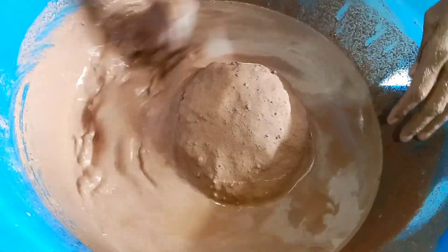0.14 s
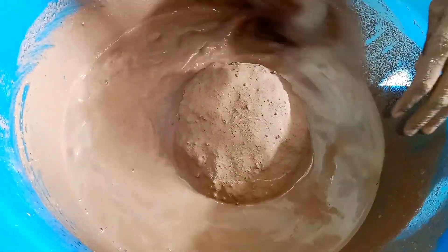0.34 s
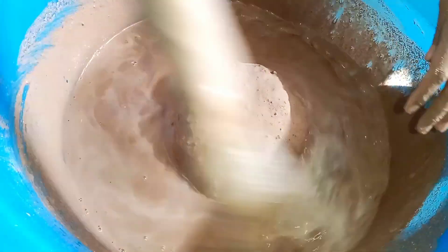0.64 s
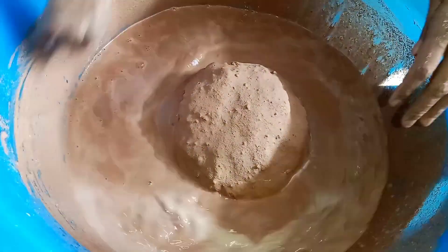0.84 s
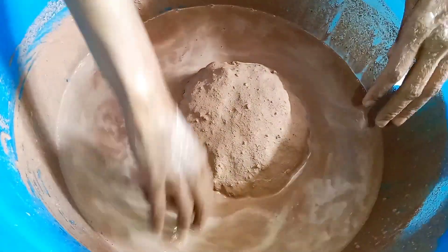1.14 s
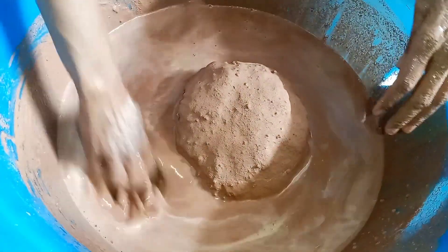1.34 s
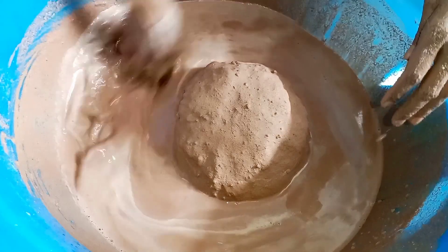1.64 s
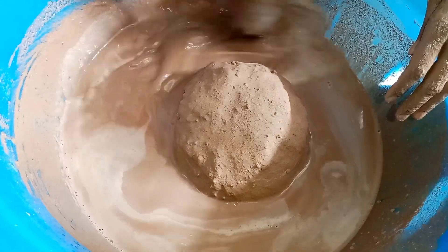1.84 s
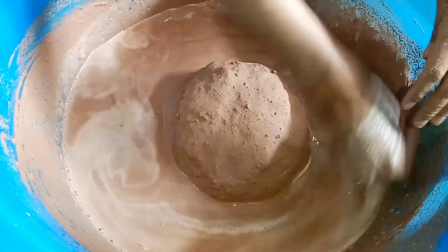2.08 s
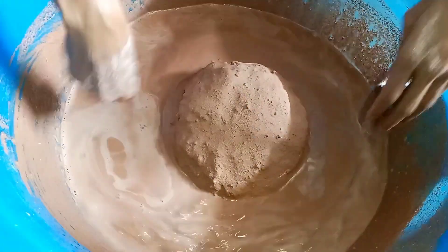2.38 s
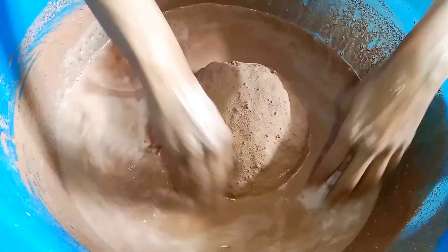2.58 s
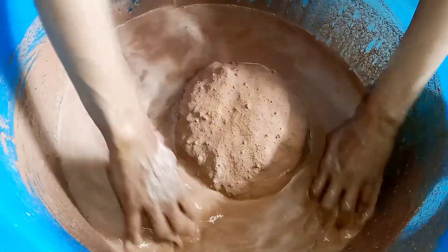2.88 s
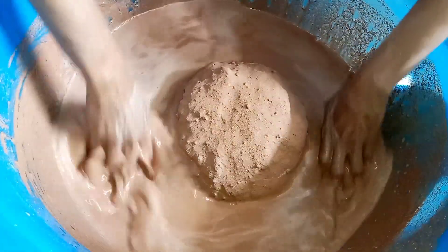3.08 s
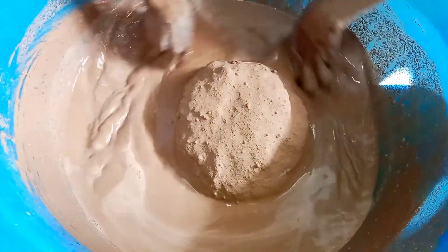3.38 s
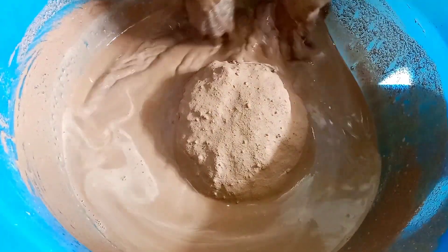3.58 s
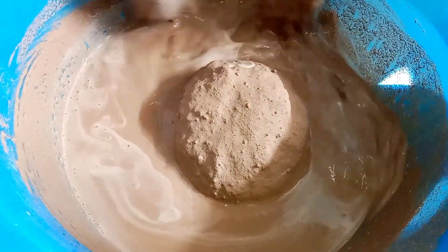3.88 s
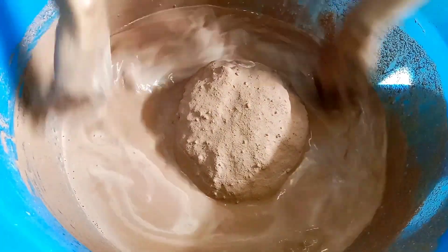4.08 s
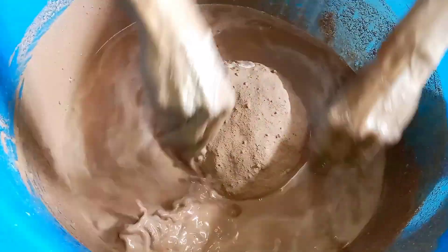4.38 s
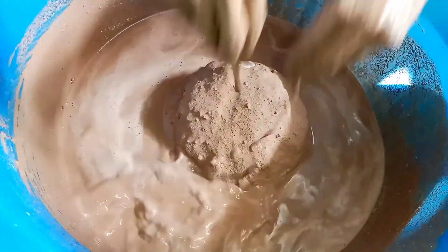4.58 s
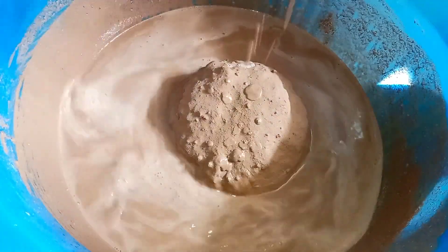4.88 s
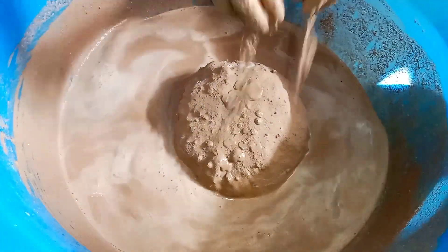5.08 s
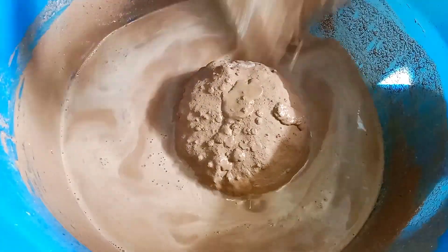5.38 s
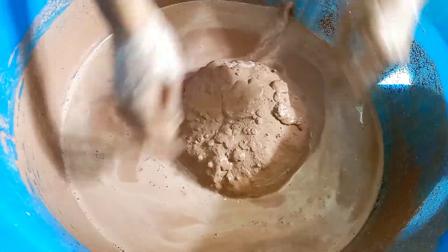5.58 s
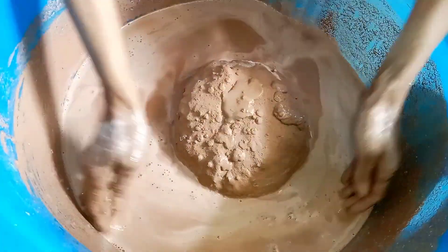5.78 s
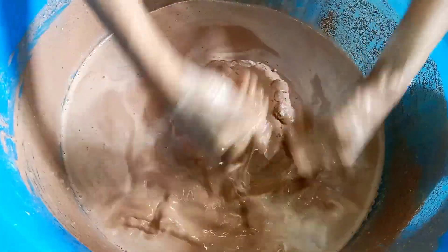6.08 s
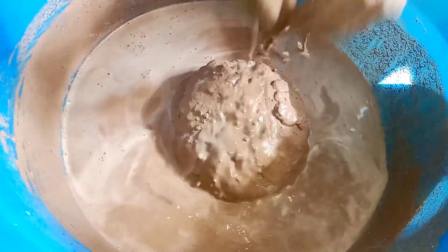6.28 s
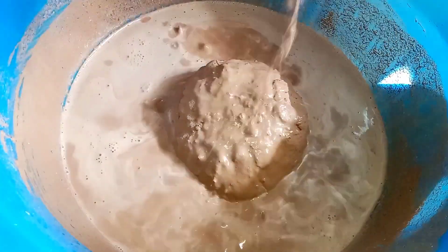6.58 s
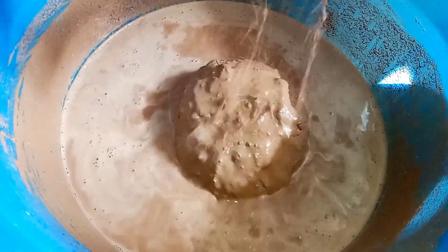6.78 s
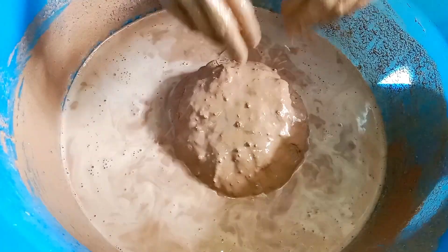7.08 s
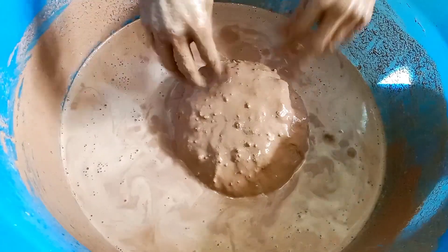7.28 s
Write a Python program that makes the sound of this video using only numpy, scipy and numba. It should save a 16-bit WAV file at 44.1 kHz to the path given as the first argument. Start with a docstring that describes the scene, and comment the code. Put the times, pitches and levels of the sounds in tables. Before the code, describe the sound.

Close, wet churning of muddy water in a plastic tub, loud at first, thinning to trickles and pattering drops, with faint birds and a far rooster.

```python
"""Hands stir thin mud round a plastic tub, close by, and let it run over a lump of clay.
Sloshes, strongest at first, fold in air: bubble clouds gurgle, babble and fizz, single bubbles plop and ring,
hollows behind the hands swish on gliding resonances, flat blows slap, and the tub booms on its lowest mode.
From about 4.6 s the stirring is mostly weaker. Birds, narrow bands of noise, call faintly at 1.2 s and from 5.3 s.
A far rooster, two blurred harmonics, crows from 6.2 s to 7.1 s; at 6.5 s drops patter on the clay as brief bubbles."""
import sys
import numpy as np
from scipy import signal
from scipy.fft import rfft, irfft
from scipy.io import wavfile
from scipy.ndimage import uniform_filter1d
from numba import njit

SR = 44100
rng = np.random.default_rng(int(sys.argv[2]) if len(sys.argv) > 2 else 0)


def transcribe(u):
    """Save the signal u as a 16-bit wav file named by the first command-line argument.

    u: samples, shape (n,) or (channels, n), limited to [-1, 1]; the rate is SR.
    q: integer samples, one column per channel.
    """
    v = np.clip(np.atleast_2d(u).T, -1, 1)
    q = np.round(v * 32767).astype(np.int16)
    wavfile.write(sys.argv[1], SR, q)


N = 328099
TIME = np.arange(N) / SR

# overall spectrum of the splashing, with a dip near 4.3 kHz: frequency_hz, gain_db
WATER_COLOUR = [(130, -13), (200, -7), (380, 0.5), (630, -3), (760, 4.5), (1350, -7), (1650, -4.5),
                (2100, -5), (3500, 4), (4100, -7.5), (4500, -8), (5600, 2.5), (8000, -5), (12500, -4.5),
                (15300, 1.5)]


def undb(db):
    """Level: decibels become an amplitude ratio."""
    return 10 ** (np.asarray(db) / 20)


def unit(x):
    """Normalisation: scale to rms 1."""
    return x / np.sqrt(np.mean(x ** 2))


def add(track, s, sound):
    """Superposition: mix a sound in at time s."""
    i = max(int(s * SR), 0)
    track[i:i + len(sound)] += sound[:max(N - i, 0)]


def band(x, lo_hz, hi_hz, order=3):
    """Band-pass filtering: keep what lies between two frequencies."""
    edges_hz = [lo_hz, min(hi_hz, SR / 2 - 1)]
    return signal.sosfilt(signal.butter(order, edges_hz, "band", fs=SR, output="sos"), x)


def colour(x, points, size=2048):
    """Minimum-phase filtering through (Hz, dB) points: causal, so that clicks keep their sharp front."""
    hz, db = np.transpose(points)
    bins_hz = np.maximum(np.arange(size // 2 + 1) * SR / size, 1)
    gain_db = np.interp(np.log(bins_hz), np.log(hz), db)
    cepstrum = irfft(np.log(undb(gain_db)))
    cepstrum[1:size // 2] *= 2  # folding the cepstrum forward makes the phase minimal
    cepstrum[size // 2 + 1:] = 0
    impulse = irfft(np.exp(rfft(cepstrum)))
    return signal.fftconvolve(x, impulse)[:N]


def walk(rate_per_s):
    """Slow random fluctuation, rms 1: straight lines between random knots."""
    knots = rng.standard_normal(N // 100)
    return unit(np.interp(TIME * rate_per_s, np.arange(len(knots)), knots))


def burst(t60_s, size=16384):
    """Exponential decay: noise that falls by 60 dB in t60_s."""
    return rng.standard_normal(size) * np.exp(-np.log(1000) * np.arange(size) / SR / t60_s)


def envelope(rise_s, hold_s, t60_s):
    """Build-up and decay: a swell that starts gently and steepens, a hold, an exponential fall."""
    age = TIME[:int((rise_s + hold_s + 2 * t60_s) * SR)]
    swell = np.clip(age / max(rise_s, 1 / SR), 0, 1) ** 2
    return swell * np.exp(-np.log(1000) * np.maximum(age - rise_s - hold_s, 0) / t60_s)


def resonance(hz, width_hz):
    """Narrow-band resonance: slow noise modulates a moving carrier in quadrature, rms 1."""
    low_pass = signal.butter(2, width_hz / 2, fs=SR, output="sos")
    slow = signal.sosfilt(low_pass, rng.standard_normal((2, len(hz))))
    angle = 2 * np.pi * np.cumsum(hz) / SR
    return unit(slow[0] * np.sin(angle) + slow[1] * np.cos(angle))


def echoes(x, t60_s, db, delay_s):
    """Reverberation: dense reflections that start after a short delay and decay exponentially."""
    tail = band(burst(t60_s, size=32768), 290, 6000, order=1)
    tail = tail / np.sqrt(np.sum(tail ** 2))
    tail = np.concatenate([np.zeros(int(delay_s * SR)), tail])
    return undb(db) * signal.fftconvolve(x, tail)[:N]


@njit
def bubbles(starts, pitches, sizes, lives, rise):
    """Bubble oscillation: each swells within a cycle, rings down, and rises in pitch as it nears the surface."""
    out = np.zeros(N)
    for k in range(len(starts)):
        first = max(int(starts[k] * SR), 0)
        length = int(lives[k] / pitches[k] * SR) + 2  # lives are in cycles, down to -60 dB
        step, phase, top = pitches[k] / SR, 0., 1e-9
        shape = np.empty(length)
        for i in range(length):
            shape[i] = (1 - np.exp(-1.5 * i * step)) * np.exp(-6.9 * i * step / lives[k])
            top = max(top, shape[i])
        for i in range(min(length, N - first)):
            out[first + i] += sizes[k] * shape[i] / top * np.sin(phase)
            phase += 2 * np.pi * step * (1 + rise * i / length)
    return out


def yard():
    """Stationary noise: the quiet yard and microphone hiss, shaped by a fixed spectrum."""
    # spectrum of the background: frequency_hz, gain_db
    yard_colour = [(30, -6), (80, 3.5), (160, -3.5), (400, -12.5), (1000, -22), (3000, -23), (4300, -44.5),
                   (7300, -25.5), (7900, -8), (10300, -13), (11000, -39), (15500, -27.5)]
    return undb(-62) * unit(colour(rng.standard_normal(N), yard_colour))


def birds():
    """Narrow-band noise: soft, hoarse calls that swell and fade, blurred by distance."""
    # faint far birds: start_s, length_s, pitch_hz, level_db (before the swell), width_hz
    bird_calls = [(1.166, 0.12, 2700, -67, 30), (5.33, 0.16, 1300, -69, 200), (5.64, 0.1, 2000, -69, 120),
                  (6.41, .09, 800, -51, 40), (6.68, .13, 800, -53, 50), (6.88, .19, 2490, -65, 70),
                  (6.97, 0.16, 719, -60, 35), (7.14, .12, 719, -59, 35), (7.06, .07, 1265, -64, 70),
                  (7.19, .17, 1280, -67, 90), (7.08, .28, 1880, -62, 220), (7.3, .1, 1950, -60, 70),
                  (7.36, .08, 2490, -67, 80)]
    out = np.zeros(N)
    for s, length_s, hz, db, width_hz in bird_calls:
        swell = np.sin(np.linspace(0, np.pi, int(length_s * SR)))
        call = resonance(np.full(len(swell), float(hz)), width_hz)
        add(out, s, undb(db) * swell * call)
    return out


def rooster(rough=0.0067, flutter_db=2.0, blur_db=-7, width_hz=110):
    """Multipath scattering: two harmonics of one far crow, the second the stronger, blurred by many paths."""
    # the crow swells and fades on its way: time_s, second_harmonic_db, fundamental_db
    crow_levels = [(6.16, -69, -85), (6.21, -51, -86), (6.28, -51, -70), (6.335, -40.5, -52),
                   (6.41, -50, -78), (6.485, -32.5, -49), (6.552, -42, -70), (6.59, -41.5, -45),
                   (6.635, -33, -42.5), (6.68, -41, -58), (6.77, -46, -52), (6.8, -48.5, -58),
                   (7.0, -66.5, -77), (7.101, -100, -100)]
    crow_hz, sag_from_s, sag_hz_per_s = 930, 6.66, 50.6
    s, second_db, first_db = np.transpose(crow_levels)
    steady_hz = crow_hz - sag_hz_per_s * np.maximum(TIME - sag_from_s, 0)
    hz = steady_hz * (1 + rough * walk(120))

    def partial(hz, db):
        """Scattering: a sine with a halo of scattered copies."""
        tone = np.sin(2 * np.pi * np.cumsum(hz) / SR) + undb(blur_db) * resonance(hz, width_hz)
        return unit(tone) * undb(np.interp(TIME, s, db, left=-np.inf, right=-np.inf))

    harmonics = partial(2 * hz, second_db) + partial(hz, first_db)
    return harmonics * undb(flutter_db * walk(30))


def tub(mode_hz=72, wander=0.043, rumble_db=-7):
    """Modal vibration: each flex booms on the tub's lowest mode; its pitch wanders as the water shifts."""
    # the tub flexes when the load shifts: start_s, hold_s, level_db (of the ring, without the rumble)
    tub_flexes = [(0.076, 0.074, -43), (0.3, .03, -45), (0.515, 0.021, -44.5), (0.919, 0.049, -45),
                  (1.395, 0.1, -42), (1.77, 0.21, -41), (2.325, 0.059, -43.5), (3.195, 0.019, -46.5),
                  (3.98, 0.011, -48), (4.266, 0.18, -43), (4.648, 0.21, -55.5), (5.38, 0.36, -55),
                  (5.836, 0.4, -47), (6.775, 0.11, -46.5)]
    rise_s, t60_s, rest_db = .055, 0.44, -71.5
    hz = mode_hz * (1 + wander * walk(4.7))
    ring = np.sqrt(2) * np.sin(2 * np.pi * np.cumsum(hz) / SR)
    rumble = unit(band(rng.standard_normal(N), 62, 112))
    flex = np.full(N, undb(rest_db))
    for s, hold_s, db in tub_flexes:
        add(flex, s, undb(db) * envelope(rise_s, hold_s, t60_s))
    return (ring + undb(rumble_db) * rumble) * flex


def hollow(x):
    """Sympathetic resonance: the tub and its air ring along with the water on a few fixed notes."""
    # resonances of the tub and the air inside it: frequency_hz, width_hz, gain_db
    tub_modes = [(194, 16, -0.5), (312, 14, -12.5), (768, 21, -4.5), (930, 17, -16), (1067, 12, -4),
                 (1390, 12, -6.5), (2740, 14, -6), (1555, 11, -10.5), (1626, 18, -10), (1742, 11, -5),
                 (2240, 21, -14), (2890, 13, -2.5), (3128, 42, -8), (5585, 260, -15.5)]
    out = np.zeros(N)
    for hz, width_hz, db in tub_modes:
        out += undb(db) * band(x, hz - width_hz / 2, hz + width_hz / 2, order=1)
    return out


def drops(db=-31, spread_db=4, lo_hz=2600, hi_hz=9500, cycles=13, count=60):
    """Random impacts: fine drops from the lifted hands patter on wet clay, each with its own size and note."""
    from_s, to_s = 6.47, 6.82
    when, note, size = rng.random((count, 3)).T
    starts = from_s + when * (to_s - from_s)
    pitches = lo_hz * (hi_hz / lo_hz) ** note
    sizes = undb(db - spread_db * np.log(1 - size * .97))  # many small, few large
    patter = bubbles(starts, pitches, sizes, np.full(count, float(cycles)), 0.14)
    return colour(patter, WATER_COLOUR)


def slaps():
    """Impact noise: hands and sheets of water hit the surface flat and throw a burst of spray."""
    # blows on the surface: start_s, level_db (before filtering), t60_s
    slap_blows = [(0.773, -14, 0.029), (2.342, -27.5, 0.19), (3.538, -18.5, 0.033), (4.53, -23, 0.046),
                  (5.827, -28, 0.063)]
    out = np.zeros(N)
    for s, db, t60_s in slap_blows:
        add(out, s, undb(db) * burst(t60_s))
    return band(colour(out, WATER_COLOUR), 710, 11000)


def swishes():
    """Cavity resonance: water sheeting past the fingers rings a hollow whose changing size glides its note."""
    # hollows: start_s, rise_s, hold_s, t60_s, level_db, first_hz, last_hz, width_hz
    hollow_glides = [(0.059, 0.015, 0.0075, 0.059, -28, 2300, 1483, 890),
                     (0.468, 0.013, 0.0036, .06, -22, 4355, 3100, 1800),
                     (1.409, 0.023, 0.054, .12, -40, 2900, 2206, 890),
                     (1.656, 0.0014, .02, .07, -26, 2920, 3200, 250),
                     (2.88, 0.065, 0.074, 0.32, -46, 1650, 1600, 600),
                     (2.932, 0.074, 0.19, .25, -52.5, 420, 389, 69.5),
                     (3.27, 0.041, .05, 0.13, -40, 1820, 1603, 447),
                     (3.353, 0.039, 0.022, 0.094, -36, 1700, 2088, 500),
                     (4.035, 0.026, 0.0073, .2, -22, 5040, 4500, 1100),
                     (4.104, 0.024, 0.022, 0.18, -44, 744, 626, 200),
                     (4.283, 0.0165, .03, .3, -46, 1471, 1296, 180),
                     (4.279, 0.017, 0.045, 0.25, -45, 2550, 3180, 400),
                     (4.413, 0.017, 0.013, 0.15, -49.5, 2400, 2340, 200),
                     (4.52, 0.0095, .005, 0.19, -50, 1093, 1000, 250),
                     (4.583, 0.027, 0.0079, 0.18, -60.5, 2710, 2700, 130)]
    out = np.zeros(N)
    for s, rise_s, hold_s, t60_s, db, first_hz, last_hz, width_hz in hollow_glides:
        shape = envelope(rise_s, hold_s, t60_s)
        hz = np.interp(TIME[:len(shape)], [0, rise_s + hold_s], [first_hz, last_hz])
        add(out, s, undb(db) * shape * resonance(hz, width_hz))
    return out


def gulps(cycles=15, rise=0.43):
    """Volume resonance: big air pockets closing behind a hand ring low."""
    # air pockets: start_s, peak_db, pitch_hz
    air_pockets = [(0.301, -17, 294), (0.313, -23, 194), (0.35, -19, 525), (0.792, -30.5, 127),
                   (1.756, -34.5, 382), (2.1, -25, 385), (2.904, -34, 167), (2.928, -32.5, 174),
                   (3.897, -26.5, 485), (6.663, -40.5, 196)]
    s, db, hz = np.transpose(air_pockets)
    return bubbles(s, hz, undb(db), np.full(len(s), float(cycles)), float(rise))


def plops(snap_hz=3600):
    """Impulsive excitation: a film snaps and the bubble under it rings."""
    # single bubbles, loud and faint: start_s, pitch_hz, peak_db, cycles (until silent)
    single_bubbles = [(0.0196, 1400, -13, 4.5), (0.031, 3140, -5.5, 8), (0.037, 3120, -11, 16),
                      (0.077, 1410, -13, 16), (0.104, 5700, -3, 8.7), (0.0811, 1370, -5, 12),
                      (0.0996, 7260, 0, 4.1), (0.1677, 2800, -8, 4.9), (0.2525, 2740, -15.5, 24),
                      (0.283, 1630, -2.5, 7.9), (0.354, 1640, -2, 27), (0.3917, 766, -16, 59),
                      (0.392, 2050, -3, 3.2), (0.4448, 5300, -9, 11), (0.36, 1580, -18, 18),
                      (0.376, 1520, -10.5, 14), (0.586, 3400, -16.5, 14), (0.4079, 1600, -7.5, 9.7),
                      (0.4816, 3080, -2, 38), (0.506, 2430, -3.5, 20), (0.5153, 2240, -4, 17),
                      (0.5275, 3280, -3, 16), (0.569, 6000, -5, 10), (0.6145, 3330, -12.5, 21),
                      (0.65, 5900, -15, 26), (0.7736, 960, -12.5, 20), (0.7992, 3110, -22, 9),
                      (0.9052, 6460, -9, 15), (0.822, 5840, -19, 14), (0.837, 5530, -13, 22),
                      (0.969, 2620, -21.5, 8.7),  (1.095, 2610, -37.5, 19), (1.5031, 2030, -11, 11.2),
                      (1.5403, 1720, -11, 18), (1.6286, 1800, -7, 7.3), (1.63, 827, -22, 42),
                      (1.641, 2310, -10.5, 14), (1.704, 960, -20, 35), (1.762, 2920, -8.5, 33),
                      (1.7633, 5570, -2.5, 13), (1.771, 3380, -5, 12), (1.882, 2120, -17, 5.9),
                      (1.9574, 710, -25, 37), (1.9943, 1400, -10, 12), (2.0332, 1570, -11, 7.8),
                      (2.061, 2770, -16, 18), (2.077, 3170, -25, 11), (2.994, 1710, -22.5, 20),
                      (2.1053, 3460, -13, 14), (2.491, 1400, -44, 90), (2.4998, 7230, -17.5, 11),
                      (3.1273, 2700, -15.5, 15), (3.178, 2225, -6.5, 40), (3.187, 7700, -6.5, 6.4),
                      (3.188, 1340, -22, 14), (3.19, 3000, -15, 6), (3.2286, 7200, -14.5, 3.8),
                      (3.422, 2600, -23.5, 23), (3.505, 1400, -40.5, 95), (3.5423, 1630, -18, 13),
                      (3.586, 1740, -29, 13), (3.7483, 1410, -24.5, 17), (3.7883, 2750, -19, 22),
                      (3.8166, 780, -24, 40), (3.8156, 6000, -14, 7.1), (3.832, 1800, -18, 9.1),
                      (3.877, 3250, -11, 9), (3.901, 780, -17, 21), (3.945, 3670, -19, 23),
                      (4.032, 1680, -12, 15), (3.8436, 5950, -5.5, 6.9), (3.8531, 1540, -10.5, 10),
                      (4.0052, 1600, -13.5, 17), (4.1026, 3300, -15, 7.2), (4.112, 2830, -11, 9),
                      (4.197, 2000, -30, 24), (4.296, 9200, -15, 4.9), (4.3474, 6900, -14, 20),
                      (4.481, 2400, -29.5, 27), (4.481, 1680, -34, 40), (4.497, 1070, -28, 33),
                      (4.532, 1004, -28, 50), (4.534, 5900, -22.5, 37), (5.1687, 10100, -21.5, 5.3),
                      (5.243, 7100, -23, 6.6), (5.922, 5130, -18, 6.3), (5.952, 1370, -26.5, 12),
                      (5.9822, 1790, -16.5, 12), (6.024, 1780, -24.5, 22), (6.166, 5600, -18, 28),
                      (5.9836, 1620, -22.5, 47), (6.033, 5650, -18.5, 38), (6.0606, 3120, -12, 6.4),
                      (6.098, 1430, -32, 75), (6.164, 1845, -27, 53), (6.4137, 6240, -24.5, 36),
                      (6.476, 3430, -24, 50), (6.498, 12500, -11, 36), (6.533, 2390, -29.5, 62),
                      (6.312, 2740, -40, 22), (6.665, 1650, -36, 27), (6.809, 3180, -32.5, 16),
                      (6.5337, 12600, -12, 6.5), (6.701, 11900, -12.5, 5.5), (6.756, 6230, -10, 5.6),
                      (6.8124, 6100, -10, 8.9), (6.882, 1030, -31, 37), (6.93, 6500, -19.5, 19),
                      (6.9541, 6630, -17.5, 34)]
    s, hz, db, cycles = np.transpose(single_bubbles)
    # relative to its bubble a snap is weaker by 3 dB for each doubling of the ring
    snap_db = db - 9 - 3 * np.log2(cycles / 10)
    snaps = np.zeros(N)
    for start_s, level_db in zip(s, snap_db):
        add(snaps, start_s, undb(level_db) * burst(t60_s=0.0073, size=1024))
    rings = bubbles(s, hz, undb(db), np.maximum(cycles, 1), .05)
    return rings + band(snaps, snap_hz, 16000, order=2)


def slosh_drive():
    """Incoherent addition: layer strengths sum in power; babble power weights the mean log bubble pitch."""
    # one row for each push of a hand or spill of water: start_s, rise_s, hold_s, t60_s (of the babble),
    # gurgle_db, babble_db, spray_db, mist_db, pitch_hz (typical bubble)
    slosh_pushes = [(0.0, 0.0017, .09, 0.23, -54, -22.5, -26, -32, 1910),
                    (0.155, 0.0092, 0.02, 0.95, -49, -30.5, -35.5, -41, 1565),
                    (0.286, 0.009, 0.12, 0.45, -35.5, -24.5, -32.5, -43, 1416),
                    (0.449, 0.024, 0.066, 0.32, -51, -23.5, -30.5, -41, 2105),
                    (0.563, 0.015, 0.041, 0.34, -51, -35.5, -34, -35.5, 1557),
                    (0.767, 0.007, .122, 0.33, -52.5, -28.5, -26.5, -27, 1749),
                    (1.35, 0.14, 0.088, 0.43, -61.5, -36.5, -43, -46, 2200),
                    (1.606, 0.031, 0.04, 0.39, -47.5, -31, -37.5, -44, 2028),
                    (1.707, .06, 0.016, 0.34, -39, -31, -30, -41, 1250),
                    (1.929, 0.013, .02, 0.27, -59, -30, -38.5, -52, 1050),
                    (1.966, 0.018, .09, .3, -62, -34, -38, -46, 2000),
                    (2.083, 0.0079, 0.0099, 0.32, -39, -35, -35, -37, 1600),
                    (2.14, .03, 0.038, 0.73, -63, -52, -44.5, -41, 1751),
                    (2.337, 0.0063, .015, 0.072, -72, -32.5, -30, -27.5, 1700),
                    (2.363, 0.054, 0.1, 0.26, -73, -59, -52, -48, 1986),
                    (2.838, 0.085, .05, 0.46, -42.5, -35.5, -37, -46, 1600),
                    (3.055, 0.099, .06, 0.71, -56, -38, -41, -53, 1760),
                    (3.268, .06, 0.084, .22, -62, -43, -49.5, -48, 2052),
                    (3.5, 0.04, 0.066, 0.22, -68, -44, -49, -56.5, 1600),
                    (3.723, 0.021, 0.039, 0.26, -81, -45.5, -45.5, -59, 1930),
                    (3.791, 0.027, 0.07, 0.87, -43.5, -30, -35, -41, 1743),
                    (3.918, 0.02, 0.11, .3, -73, -27, -29, -37.5, 1996),
                    (4.029, 0.028, 0.045, 0.3, -69, -26.5, -24.5, -31, 2700),
                    (4.06, .04, .03, 0.4, -59.5, -33, -54, -31, 941),
                    (4.27, 0.031, 0.06, 0.51, -66, -47.5, -40.5, -43.5, 2156),
                    (4.473, .02, 0.047, 0.25, -65, -50.5, -51.5, -48, 1083),
                    (4.621, .05, 0.3, 1, -80, -81, -72.5, -67, 2300),
                    (5.058, 0.025, 0.011, 0.24, -85, -71.5, -57.5, -55.5, 2486),
                    (5.137, .025, 0.0091, 0.25, -74, -56, -47.5, -43.5, 3052),
                    (5.5, 0.012, 0.037, 0.55, -68.5, -74.5, -64.5, -56.5, 1800),
                    (5.824, .004, 0.066, .45, -52.5, -39.5, -45.5, -51, 1975),
                    (5.95, .03, 0.093, 0.4, -56, -42.5, -43.5, -59, 1705),
                    (6.147, 0.011, 0.012, 0.35, -60, -50.5, -43.5, -46.5, 2400),
                    (6.307, 0.086, .05, 0.25, -51.5, -57, -52.5, -43, 2600),
                    (6.463, .012, .1, 0.27, -60, -50, -37, -39, 2700),
                    (6.644, .02, .08, 0.38, -54.5, -48.5, -40.5, -37.5, 1939),
                    (6.81, 0.049, 0.03, 0.3, -56, -44, -48, -42, 1150),
                    (7.084, 0.025, .03, 0.88, -65, -71, -64, -59, 1964),
                    (7.35, 0.052, 0.022, 0.32, -59.5, -69.5, -55.5, -74, 1885)]
    gurgle_linger, spray_linger, mist_linger = 0.89, 1.27, 1.15  # t60 as a multiple of the babble's
    gurgle, babble, spray, mist, pitch = np.full((5, N), 1e-24)
    for s, rise_s, hold_s, t60_s, gurgle_db, babble_db, spray_db, mist_db, hz in slosh_pushes:
        def power(db, linger):
            """Power of one layer of this slosh."""
            return (undb(db) * envelope(rise_s, hold_s, t60_s * linger)) ** 2

        babble_power = power(babble_db, 1)
        add(gurgle, s, power(gurgle_db, gurgle_linger))
        add(babble, s, babble_power)
        add(pitch, s, babble_power * np.log(hz / 2000))
        add(spray, s, power(spray_db, spray_linger))
        add(mist, s, power(mist_db, mist_linger))
    bubble_hz = 2000 * np.exp(pitch / babble)
    return np.sqrt(gurgle), np.sqrt(babble), np.sqrt(spray), np.sqrt(mist), bubble_hz


def wash(centre_hz, lo_hz, hi_hz, count=4):
    """Statistical limit: bubbles too faint to tell apart merge into noise, strongest near the typical pitch."""
    spread_octaves = 0.69
    edges = np.geomspace(lo_hz, hi_hz, count + 1)
    out = np.zeros(N)
    for lo, hi in zip(edges, edges[1:]):
        distance = np.log2(np.sqrt(lo * hi) / centre_hz) / spread_octaves
        out += unit(band(rng.standard_normal(N), lo, hi, order=2)) * np.exp(-(distance / 2) ** 2)
    return out


def cloud(gain, breaks_db, centre_hz, octaves, lo_hz, hi_hz, cycles, spread_db, wash_db, even_s, rise, count):
    """Random superposition: countless bubbles over a wash; flow weaker than breaks_db folds in little air."""
    when, size, life = rng.random((3, count))
    starts = when * N / SR
    centre_hz = centre_hz * np.ones(N)
    pitches = np.interp(starts, TIME, centre_hz) * 2 ** (octaves * rng.standard_normal(count))
    pitches = np.clip(pitches, 100, SR / 2 - 2000)
    sizes = undb(-spread_db * np.log(1 - size * .98))  # many small, few large
    x = bubbles(starts, pitches, sizes, cycles * 4 ** (life - .5), rise)
    folded_air = gain ** 2 / (gain ** 2 + undb(breaks_db) ** 2)
    x = unit(band(colour(x, WATER_COLOUR), lo_hz, hi_hz)) * folded_air
    smooth = colour(wash(centre_hz, lo_hz, hi_hz), WATER_COLOUR)
    x = x + undb(wash_db) * unit(band(smooth, lo_hz, hi_hz))
    # even out the local power over even_s, so that the gain alone sets the level
    width = int(even_s * SR)
    power = uniform_filter1d(uniform_filter1d(x ** 2, width), width)
    return gain * x / np.sqrt(np.abs(power) + 1e-12)


def sloshing():
    """Air entrainment: pockets gurgle, beads babble, droplets fizz, and the finest mist sizzles."""
    gurgle_gain, babble_gain, spray_gain, mist_gain, bubble_hz = slosh_drive()
    gurgle = cloud(gurgle_gain, breaks_db=-58.5, centre_hz=398, octaves=.55, lo_hz=158, hi_hz=720,
                   cycles=31, spread_db=4.0, wash_db=-9.0, even_s=0.022, rise=0.33, count=1400)
    babble = cloud(babble_gain, breaks_db=-41, centre_hz=bubble_hz, octaves=.5, lo_hz=720, hi_hz=4380,
                   cycles=39, spread_db=4.5, wash_db=-7.5, even_s=0.018, rise=.18, count=6000)
    spray = cloud(spray_gain, breaks_db=-49, centre_hz=6840, octaves=.5, lo_hz=4297, hi_hz=10540,
                  cycles=24, spread_db=8.0, wash_db=-3, even_s=0.11, rise=0.089, count=15000)
    mist = cloud(mist_gain, breaks_db=-63.5, centre_hz=12600, octaves=0.38, lo_hz=9900, hi_hz=18400,
                 cycles=20, spread_db=9.5, wash_db=1.5, even_s=0.033, rise=.06, count=9000)
    # a dense, bright rush grows faster than the spray: 1.8 dB per dB
    rush = unit(band(rng.standard_normal(N), 3800, 11000, order=2)) * undb(10) * spray_gain ** 1.8
    # the surface tears in fits where the babble is strong
    tearing = babble_gain / (babble_gain + undb(-41))
    surge = undb(3 * walk(150) * tearing)
    churn = gurgle + surge * (babble + spray + mist + rush)
    return churn + echoes(churn, t60_s=0.057, db=-18.0, delay_s=.0015)  # low in the tub, close to its wall


def scene():
    """Superposition: water with reflections from tub wall and yard, far calls, and the background."""
    water = sloshing() + plops() + gulps() + slaps() + swishes() + drops()
    wall = hollow(water) + echoes(water, t60_s=0.02, db=-14.5, delay_s=0.001871)
    # the spill is filtered by the splashing's spectrum once more
    spill = echoes(colour(water, WATER_COLOUR), t60_s=0.11, db=-22, delay_s=.012)
    calls = rooster() + birds()
    far = calls + echoes(calls, t60_s=1.06, db=-17.0, delay_s=0.056)
    return (water + wall + spill + tub() + far + yard())[None]


def record(dry):
    """Band limiting: the recorder clips at full scale, then cuts everything above 15.7 kHz steeply."""
    low_pass = signal.ellip(10, .2, 70, 15700, fs=SR, output="sos")
    return signal.sosfilt(low_pass, np.clip(dry, -1, 1))


dry = scene()
out = record(dry)
transcribe(out)
```